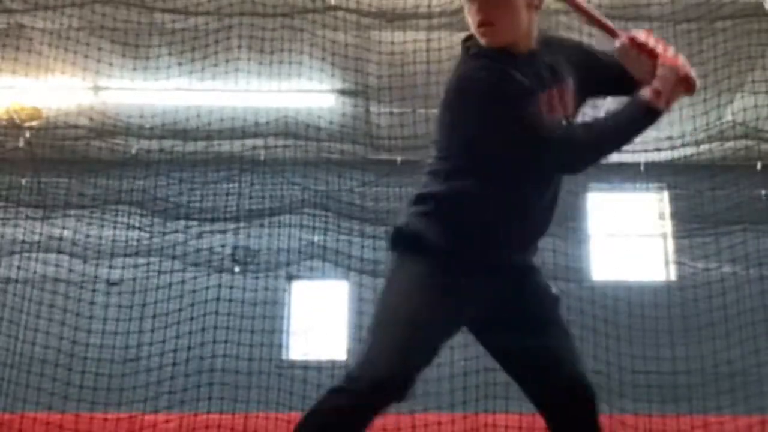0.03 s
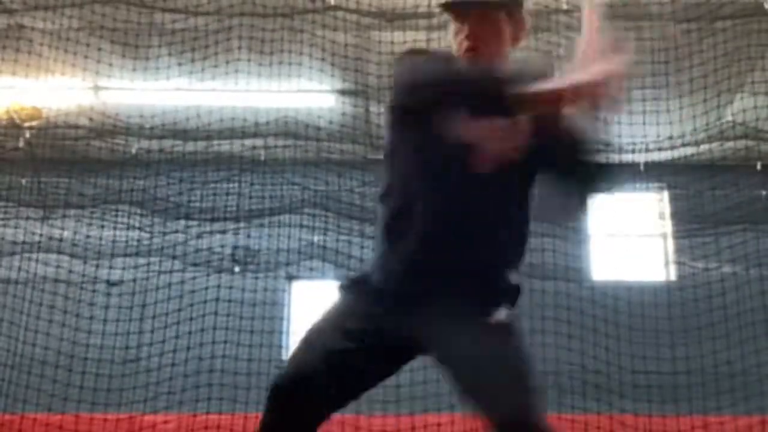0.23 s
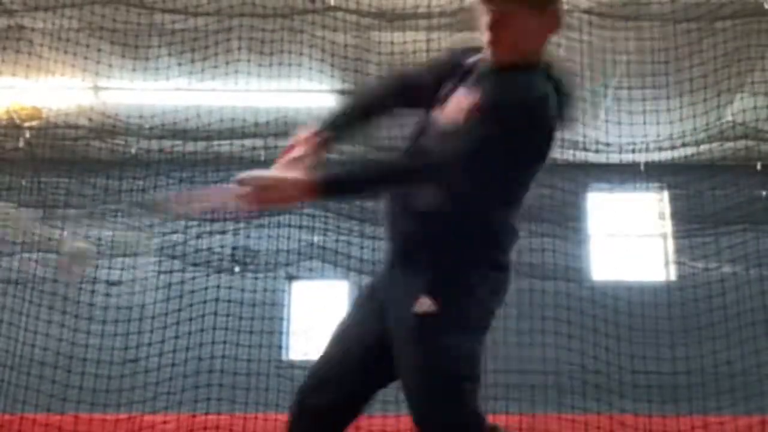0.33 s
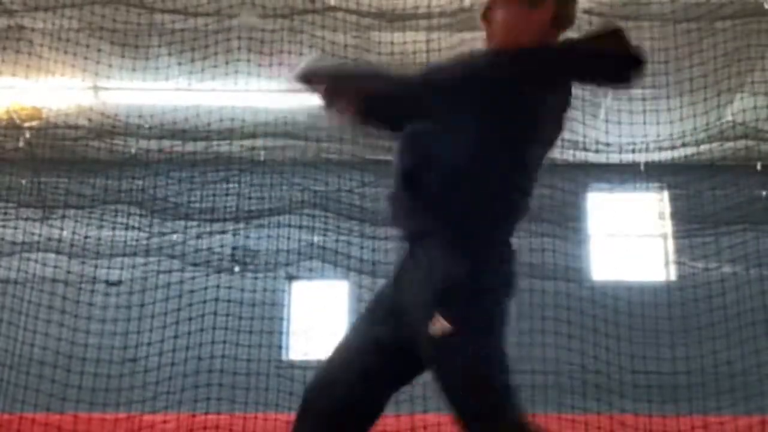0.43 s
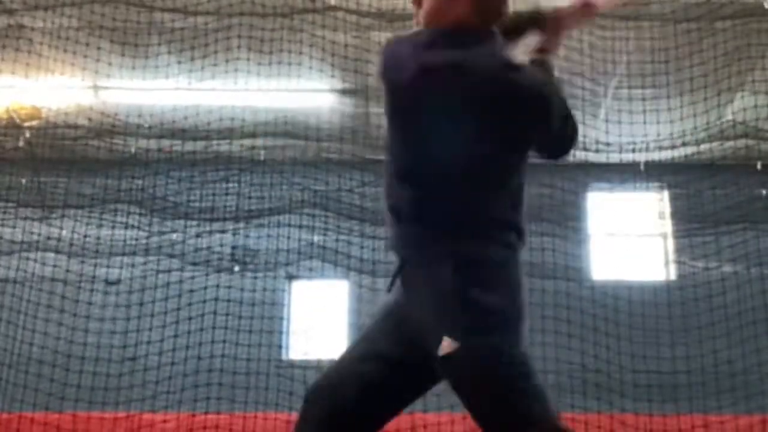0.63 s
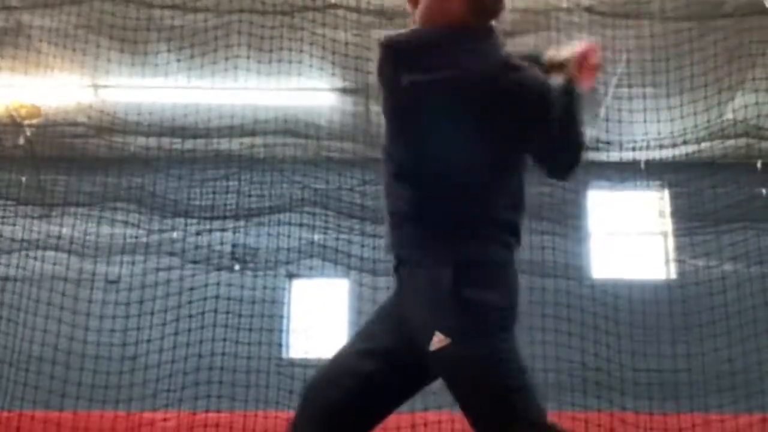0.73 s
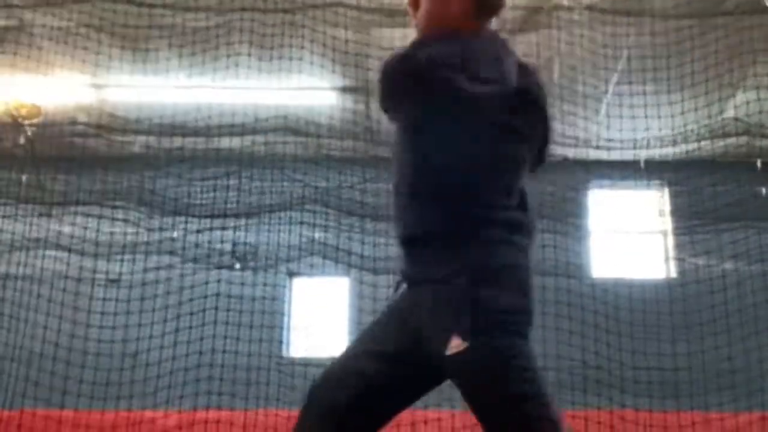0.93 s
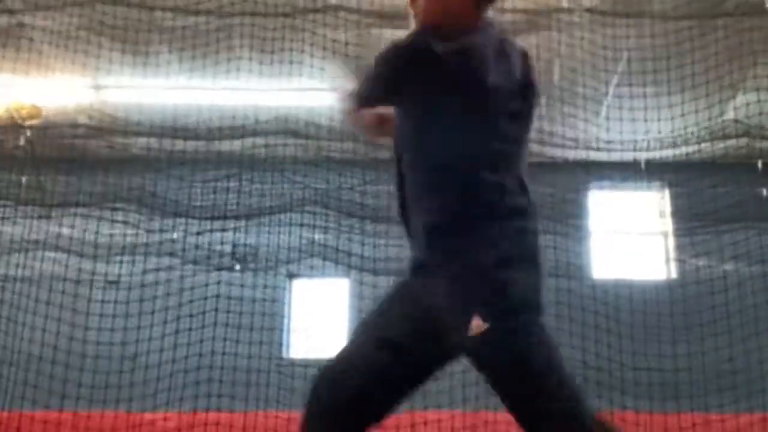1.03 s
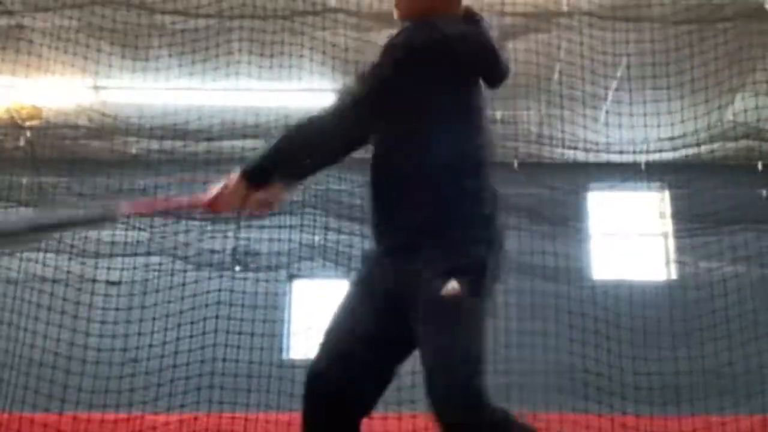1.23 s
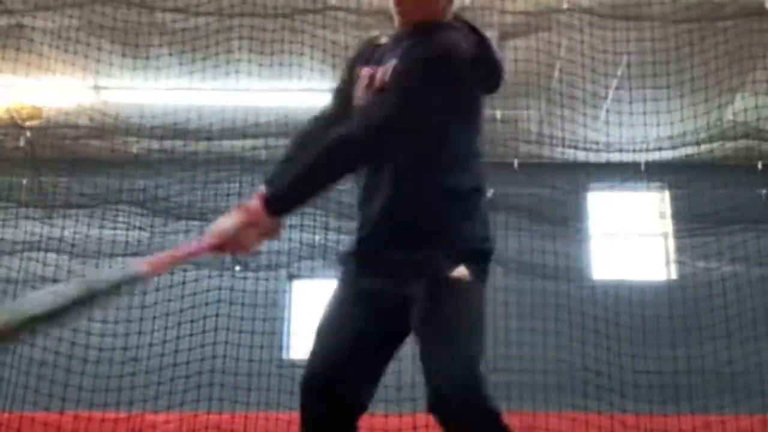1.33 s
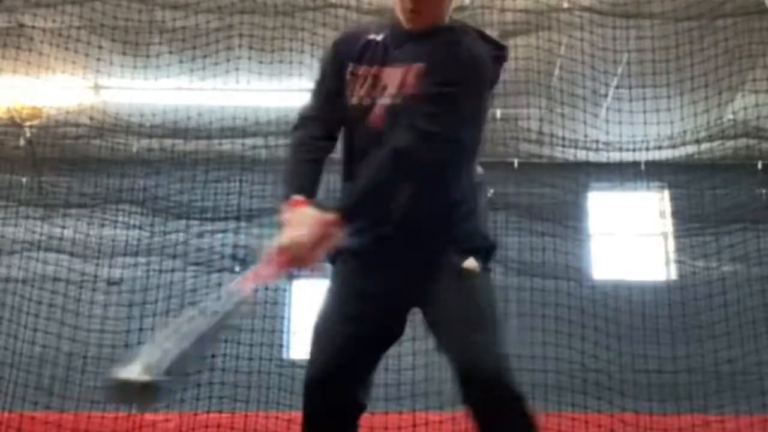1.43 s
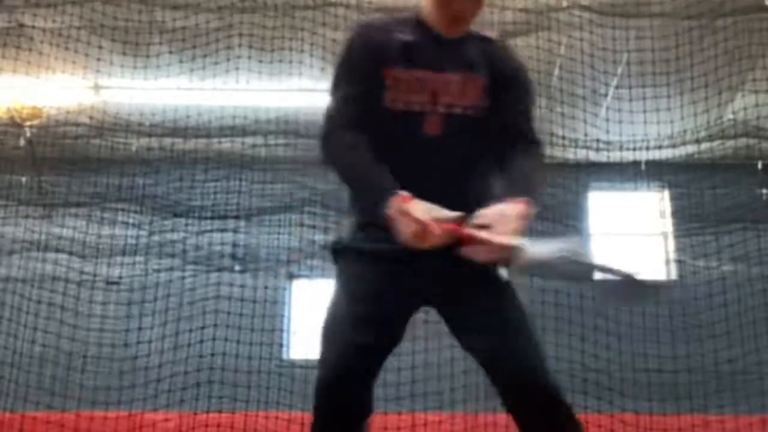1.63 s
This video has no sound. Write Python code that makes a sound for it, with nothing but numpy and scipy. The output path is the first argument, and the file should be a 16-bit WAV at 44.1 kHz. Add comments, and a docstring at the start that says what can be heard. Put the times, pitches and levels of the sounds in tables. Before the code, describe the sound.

A bat hits a ball with a sharp, bright crack at 0.24 s, after faint shoe movement and a short low whoosh. Hard slap-backs follow by 0.28 s, and the hall rings for over a second. A dull thud with faint bat ring comes at 0.65, a hollow knock at 0.82, soft bumps and scuffs around 0.9-1.2, then rustling cloth and low, heavy steps from 1.27 to 1.6 over steady rumble.

```python
"""A low whoosh, a bright crack with a brief hiss swelling into it, an instant slap-back and a long ring: a batter
swings in a netted cage in a hall. Then come a thud on the shoulder with a faint bat ring, a hollow knock,
shoe scuffs, rustling cloth and heavy steps, all over a steady low rumble. Solid contacts are sums of decaying
sine modes; air, shoes, cloth, rumble and the knocks' noisy bodies are coloured noise under level curves;
scrapes are noise in a gliding resonance; the hall is a convolved noise tail."""
import sys
import numpy as np
from scipy import signal
from scipy.fft import rfft, irfft
from scipy.io import wavfile
from scipy.ndimage import uniform_filter1d

SR = 44100
rng = np.random.default_rng(int(sys.argv[2]) if len(sys.argv) > 2 else 0)


def pcm_store(signal):
    """Save signal as 16-bit PCM."""
    levels = np.round(np.clip(np.atleast_2d(signal), -1, 1) * 32767)
    wavfile.write(sys.argv[1], SR, levels.astype(np.int16).T)


N = 74970  # length [samples]
T = np.arange(N) / SR  # time [s]
HZ = np.maximum(np.fft.rfftfreq(N, 1 / SR), 1)  # bin frequencies, kept above zero for the logarithm

HIT_S, HIT_LAG_S = 0.2351, 0.00006  # bat meets ball; delay at the right side
HALL_BUILD_S = 0.014  # rise time of the hall's tail and its lingering tones


def from_db(db):
    """Turn decibels into gain."""
    return 10 ** (np.asarray(db) / 20)


def by_hz(points):
    """Read a table over frequency at every bin, interpolating along log frequency."""
    hz, value = np.transpose(points)
    return np.interp(np.log(HZ), np.log(hz), value)


def level(points):
    """Follow a level curve of (time [s], level [dB]) and return its gain."""
    return from_db(np.interp(T, *np.transpose(points)))


def pan(db):
    """Left and right gains for a left-over-right difference in dB."""
    return from_db(np.array([[db], [-db]]) / 2)


def envelope(age, rise, t60):
    """A struck body's loudness: quick rise, then exponential decay by 60 dB in t60 seconds."""
    age = np.maximum(age, 0)
    return (1 - np.exp(-age / rise)) * np.exp(-np.log(1000) * age / t60)


def noise(colour):
    """Coloured stereo noise of rms 1, whose two sides are nearly alike in the bass."""
    # stereo likeness: (frequency [Hz], left-right correlation [-1 to 1])
    likeness = [(100, 0.99), (300, 0.94), (1000, 0.3), (3000, 0.081), (10000, 0.7)]
    mid, side = rfft(rng.standard_normal((2, N)))
    alike = by_hz(likeness)
    shared = np.sqrt(1 + alike) * mid
    opposed = np.sqrt(1 - alike) * side * [[1], [-1]]
    x = irfft(from_db(by_hz(colour)) * (shared + opposed), N)
    return x / x.std()


def grain(depth_db, size):
    """A gain that flickers at random, smoothed over size samples, with depth_db of rms swing."""
    x = uniform_filter1d(rng.standard_normal(N), size=size)
    return from_db(depth_db * x / x.std())


def struck(start, modes, lag_s=0, pitch=1, sag=0):
    """A struck body's decaying modes; they may start sharp by the share sag and settle exponentially."""
    settle_s = 0.012  # time constant of the sag
    # a positive lag delays the right side, a negative one makes it lead
    age = np.maximum(T - start - np.array([[0], [lag_s]]), 0)
    warped_age = age + sag * settle_s * (1 - np.exp(-age / settle_s))
    turn = 2 * np.pi * pitch * warped_age
    total = 0
    for k, (hz, db, rise, t60) in enumerate(modes):
        sign = (-1) ** k  # neighbouring modes start in opposite directions
        total = total + sign * from_db(db) * envelope(age, rise, t60) * np.sin(hz * turn)
    return total


def bursts(rows, colour):
    """Rough contacts: short dying puffs of noise of one colour."""
    gain = 0
    for start, db, rise, t60, pan_db in rows:
        gain = gain + from_db(db) * pan(pan_db) * envelope(T - start, rise, t60)
    return noise(colour) * gain


def rub(rows, width_hz, pan_db):
    """Friction noise in one resonance that glides with the sliding speed."""
    s, hz, db = np.transpose(rows)
    lowpass = signal.butter(2, width_hz / 2, fs=SR, output="sos")
    slow = signal.sosfilt(lowpass, rng.standard_normal((2, 2, N)))
    # slow noise on a gliding carrier becomes a band of noise around it
    turn = 2 * np.pi * np.cumsum(np.interp(T, s, hz)) / SR
    x = slow[0] * np.cos(turn) + slow[1] * np.sin(turn)
    sliding = (T > s[0]) * (T < s[-1])
    return pan(pan_db) * from_db(np.interp(T, s, db)) * sliding * x / x.std()


def crack():
    """Bat meets ball: a bright snap, the squashed ball's pock just after it and a short crackle."""
    # modes of the snap and of the ball: (frequency [Hz], level [dB], rise [s], t60 [s])
    snap_modes = [(1719, -12, 0.0004, 0.0023), (2810, 6.5, .0002, 0.0032), (3550, -10, 0.00018, 0.0027),
                  (5040, -15, 0.00022, 0.0069), (6640, -9, 0.00012, 0.0035), (9000, -6.5, .0001, 0.0018),
                  (10800, -15, 0.00011, 0.0035)]
    ball_modes = [(99.3, -20.5, .0021, 0.083), (281, -1.5, 0.0014, .014), (464, -7, 0.00038, .012),
                  (680, -7, .0002, 0.013), (877, -2, .0006, .0128), (1068, -5, 0.00044, 0.022),
                  (1290, -18, .002, 0.022), (1622, -8, .0003, 0.023), (2340, -6.5, 0.0037, 0.025),
                  (2830, -19.5, 0.00054, .043)]
    # crackle: (time [s], level [dB], rise [s], t60 [s], left over right [dB])
    crackle = [(.2352, -15.5, 0.000079, 0.004, 6), (.239, -12, 0.00025, 0.036, -3)]
    # its colour: (frequency [Hz], level [dB])
    crackle_colour = [(200, -14.5), (900, 10), (3000, 0.5), (5000, -1.5), (7000, -12), (8000, -12.5),
                      (10500, -10.5), (13000, -29.5), (16000, -34.5)]
    ball_lag_s = 0.00213
    snap = struck(HIT_S, snap_modes, HIT_LAG_S)
    pock = struck(HIT_S + ball_lag_s, ball_modes, HIT_LAG_S)
    return pan(0.5) * (snap + pock) + bursts(crackle, crackle_colour)


def whoosh_and_hiss():
    """A low whoosh of air pushed by the bat, and a brief hiss swelling into the crack."""
    # level curves: (time [s], level [dB])
    whoosh_level = [(.16, -65.5), (.195, -26), (.22, -24.5), (.24, -29), (.265, -62), (.3, -84.5)]
    hiss_level = [(.17, -88), (.218, -44.5), (.225, -28), (.23, -28), (.234, -16), (.237, -11), (.245, -88)]
    # colours: (frequency [Hz], level [dB])
    whoosh_colour = [(25, -14.5), (55, 2.5), (85, 6.5), (150, -17), (600, -22), (1200, -37.5),
                     (4000, -37.5), (9500, -51), (13000, -84.5)]
    hiss_colour = [(300, -4), (800, -6), (1400, 1.5), (1900, -7.5), (2500, -6), (4000, -7), (5500, -21.5),
                   (7000, -7.5), (8200, -34), (14000, -44.5)]
    whoosh = level(whoosh_level) * noise(whoosh_colour)
    hiss = pan(4) * level(hiss_level) * noise(hiss_colour)
    return whoosh + hiss


def slaps():
    """Hard slaps follow the crack: echoes from the cage and walls, the first carrying the bat's bright ping,
    then the ball striking the net and frame."""
    # slaps: echoes, then the ball striking the net and frame (.411 and .426 s): (time [s], level [dB], rise
    # [s], t60 [s], left over right [dB])
    slap_rows = [(.2556, -14.5, .00073, 0.02, 4.3), (.2845, -8, 0.0037, 0.027, 4.1),
                 (.325, -25, 0.0024, 0.026, 3), (.411, -23.5, 0.0017, 0.042, 1.8),
                 (.426, -30.5, .0015, 0.18, 2.7)]
    # their colour: (frequency [Hz], level [dB])
    slap_colour = [(150, -14.5), (600, -8), (1800, -11), (2550, 3), (3400, -5), (5000, -8.5), (7500, -18),
                   (11000, -29.5), (14000, -37)]
    # modes of the ping: (frequency [Hz], level [dB], rise [s], t60 [s])
    ping_modes = [(2360, -4, 0.0017, 0.012), (2610, -3.5, .002, .01), (4700, -24, .001, .015)]
    ping = pan(5.5) * struck(0.2558, ping_modes, HIT_LAG_S)
    return bursts(slap_rows, slap_colour) + ping


def hall(x):
    """Convolve with a grainy tail of scattered reflections that builds up, then dies band by band."""
    # bands of the ring: (centre [Hz], level [dB], t60 [s])
    bands = [(49.1, -1.5, 1.5), (150, 18, 1.6), (298.7, 16.5, 1.5), (573, 10.5, 1.1), (1080, 19.5, 1.02),
             (1420, 17, 1.27), (1800, 19, 1.28), (2033, 11.5, 1.38), (2500, 18.5, 1.14), (4560, 6.5, 1.03),
             (7500, -4, 0.91), (10400, -17, 0.79), (14000, -25, 0.45)]
    white = noise([(1, 0), (SR, 0)]) * grain(1.5, size=200)
    spectrum = rfft(white)
    tail = 0
    for k, (_, db, t60) in enumerate(bands):
        # each band cross-fades into its neighbours along log frequency
        weight = by_hz([(row[0], j == k) for j, row in enumerate(bands)])
        # a longer decay is scaled down so that its energy stays comparable
        gain = from_db(db) * np.sqrt(2 * np.log(1000) / (t60 * SR))
        tail = tail + gain * irfft(spectrum * weight, N) * envelope(T, HALL_BUILD_S, t60)
    return signal.fftconvolve(x, tail, axes=1)[:, :N]


def hall_tones():
    """Tones that linger in the hall after the crack, all dying at one rate."""
    # lingering tones: (frequency [Hz], level [dB])
    tones = [(1005, -44), (1213, -49.5), (1700, -48), (2272, -51.5), (2405, -49), (2560, -50),
             (2906, -46.5)]
    t60_s = 1.4
    modes = [(hz, db, HALL_BUILD_S, t60_s) for hz, db in tones]
    return struck(HIT_S, modes, lag_s=0.0001)


def knocks():
    """Shoulder thud with bat ring, hollow knock with a sagging boom, soft bump, tap, and small hard contacts."""
    # modes of each body: (frequency [Hz], level [dB], rise [s], t60 [s])
    shoulder_modes = [(228.6, -25, 0.00027, 0.16), (325, -20, 0.0058, 0.083), (426, -23, .0003, 0.071),
                      (538, -22.5, 0.00033, 0.061), (848, -29.5, .0003, 0.076), (1142, -26, .0006, 0.097),
                      (1564, -43.5, .0013, .1), (2064, 0, 0.0091, 0.014), (2520, -29.5, 0.0025, 0.059),
                      (2726, -28, .0015, 0.089), (150, -18, .001, 0.047)]
    hollow_modes = [(71, -34.5, .003, 0.26), (292, -21.5, 0.0018, 0.024), (522, -23, 0.0039, 0.067),
                    (634, -20.5, 0.0036, 0.073), (844, -27, 0.0035, 0.065), (2410, -33.5, 0.0039, 0.034)]
    boom_modes = [(283.5, -29, 0.0051, 0.17), (316.3, -24, 0.00051, 0.12)]
    bump_modes = [(105, -31.5, 0.0018, 0.051), (220, -33.5, .0017, 0.066), (298, -32.5, 0.0019, 0.078),
                  (545, -41.5, .001, 0.035)]
    tap_modes = [(333, -45, 0.00092, 0.073), (580, -42.5, 0.0026, 0.076), (674, -48, 0.0023, 0.053)]
    # the bat's long ring: (frequency [Hz], level [dB])
    bat_ring = [(4167, -54.5), (4700, -56), (5103, -48.5), (5416, -59), (6040, -58), (6551, -58.5),
                (6837, -57)]
    # noisy contacts: (time [s], level [dB], rise [s], t60 [s], left over right [dB])
    ticks = [(.645, -33.5, .0018, 0.092, 3), (.657, -37, .001, 0.047, -6), (.831, -40, 0.00075, 0.03, 8),
             (1.264, -53, .001, .04, 12), (1.405, -45, .004, .06, 4)]
    clicks = [(.131, -45.5, .001, 0.031, 1.5), (.657, -37.5, .0005, 0.011, 0),
              (.8195, -34.5, 0.00066, 0.019, 2), (1.173, -43.5, 0.0013, 0.02, -1),
              (1.6, -50.5, .001, 0.019, 8)]
    # their colours: (frequency [Hz], level [dB])
    tick_colour = [(300, 7.5), (1500, -5.5), (2400, 5.5), (3700, -2), (5000, -27), (8000, -19.5),
                   (13000, -47)]
    click_colour = [(500, 3), (2800, 1), (3800, 6.5), (4500, -11.5), (5200, -9.5), (6200, -23),
                    (8000, -14.5), (13000, -31)]
    hollow_s, boom_lag_s, ring_t60_s = 0.8235, 0.01, 0.2
    ring_modes = [(hz, db, 0.002, ring_t60_s) for hz, db in bat_ring]
    shoulder = struck(0.6544, shoulder_modes + ring_modes, lag_s=-0.000462)
    hollow = struck(hollow_s, hollow_modes, lag_s=-0.00046)
    boom = struck(hollow_s + boom_lag_s, boom_modes, lag_s=-0.00073, sag=0.17)
    bump = struck(0.886, bump_modes, lag_s=-0.00048)
    tap = struck(1.088, tap_modes)
    hard = bursts(ticks, tick_colour) + bursts(clicks, click_colour)
    return shoulder + hollow + boom + bump + tap + hard


def floor_steps():
    """Heavy steps set the floor's low modes booming, each at its own pitch."""
    # modes of the floor: (frequency [Hz], level [dB], rise [s], t60 [s])
    floor_modes = [(94.7, 0.5, 0.011, 0.12), (126.4, 2, 0.0024, 0.039), (190.6, -9, 0.0042, 0.15),
                   (275, -16.5, 0.0092, 0.11)]
    # steps: (time [s], level [dB], pitch [ratio])
    steps = [(1.272, -12.5, 0.93), (1.304, -22, 1.1), (1.358, -24.5, 0.926), (1.391, -22, 0.95),
             (1.422, -24, 0.87), (1.501, -15.5, 0.98), (1.515, -21, 1.053), (1.539, -30.5, 1.12),
             (1.589, -26, 1.03)]
    return sum(from_db(db) * struck(s, floor_modes, pitch=pitch) for s, db, pitch in steps)


def shoes_and_knock_bodies():
    """Noise puffs for shoe scuffs and the noisy body of thud and knock; swelling strides, a gliding scrape."""
    # puffs: shoe scuffs, and the noisy body of the thud (.656 s) and the hollow knock (.828 s):
    # (time [s], level [dB], rise [s], t60 [s], left over right [dB])
    puffs = [(.026, -32, 0.0025, .11, 1.5), (.058, -42, 0.0035, 0.098, 2.5),
             (.656, -27.5, 0.0017, 0.1, -0.5), (.828, -41, 0.002, .1, 2), (.995, -32.5, .016, .11, 4),
             (1.032, -47, 0.021, .28, 3.5), (1.175, -40, 0.0015, 0.034, 5)]
    # level curves: (time [s], level [dB])
    stride_level = [(.02, -85.5), (.035, -58), (.11, -44.5), (.18, -48.5), (.24, -43), (.3, -89)]
    shuffle_level = [(1.42, -59), (1.5, -37), (1.53, -32.5), (1.57, -44.5), (1.61, -39), (1.7, -44.5)]
    # colours: (frequency [Hz], level [dB])
    puff_colour = [(100, -14), (290, 13), (450, -6), (700, 3.5), (1200, -0.5), (2300, 1), (3400, -20.5),
                   (8000, -34.5), (13000, -44)]
    stride_colour = [(100, 7.5), (270, 8), (500, -6), (1000, -2), (2400, -1), (3500, -14), (7000, -24.5),
                     (10000, -27), (12500, -46)]
    shuffle_colour = [(50, -22), (110, 4), (190, 6), (300, -7), (450, -14), (900, -24.5), (2000, -42.5),
                      (8000, -78)]
    # sole scrape: (time [s], resonance [Hz], level [dB])
    sole_scrape = [(1.169, 3384, -76), (1.176, 2893, -46.5), (1.181, 1990, -47), (1.188, 1300, -51.5),
                   (1.205, 1110, -65)]
    stride = level(stride_level) * noise(stride_colour)
    shuffle = level(shuffle_level) * noise(shuffle_colour)
    scrape = rub(sole_scrape, width_hz=1800, pan_db=5)
    return bursts(puffs, puff_colour) + stride + shuffle + scrape


def clothes():
    """Cloth rubs on cloth: sleeves brush and zip in a gliding resonance, and a grainy rustle flickers."""
    # sleeve rubs: (time [s], level [dB], rise [s], t60 [s], left over right [dB])
    sleeve_rubs = [(1.212, -56.5, .002, 0.34, 0.0), (1.258, -57, 0.009, 0.38, 0.0)]
    # sleeve zip: (time [s], resonance [Hz], level [dB])
    sleeve_zip = [(1.208, 4900, -78), (1.217, 4700, -64), (1.235, 3945, -67.5), (1.27, 4190, -58.5),
                  (1.315, 3650, -61.5), (1.345, 3500, -73), (1.39, 3550, -60), (1.45, 3530, -74)]
    # rustle: (time [s], level [dB])
    rustle_level = [(1.19, -79), (1.24, -62.5), (1.3, -51.5), (1.35, -54.5), (1.45, -50.5), (1.515, -43.5),
                    (1.56, -50), (1.61, -52), (1.7, -69)]
    # colours: (frequency [Hz], level [dB])
    sleeve_colour = [(500, -30), (2900, -10), (3300, 7), (3700, -10), (5500, -11.5), (8000, -22),
                     (12000, -40.5)]
    rustle_colour = [(40, -16), (150, 11.5), (300, 10), (600, 1.5), (1200, 1), (2700, -7.5), (3500, -4),
                     (4800, -9.5), (7000, -17.5), (10000, -28.5), (12500, -55.5)]
    sleeves = bursts(sleeve_rubs, sleeve_colour) + rub(sleeve_zip, width_hz=480, pan_db=6)
    rustle = level(rustle_level) * noise(rustle_colour) * grain(1.5, size=260)
    return sleeves + rustle


def air():
    """The hall's steady low rumble, as noise weighted towards the bass."""
    # colour of the rumble: (frequency [Hz], level [dB])
    air_colour = [(20, -14.5), (40, -2.5), (60, -4.5), (95, 1.5), (140, -10.5), (300, -21.5), (550, -32.5),
                  (1200, -36), (2500, -35.5), (4500, -50), (9500, -59), (12500, -88.5)]
    return from_db(-44.5) * noise(air_colour)


def scene():
    """The crack reaches the hall as one sharp impulse; the nearby small sounds stay drier."""
    near_to_hall_db = -38  # how much the nearby sounds excite the hall
    near = knocks() + floor_steps() + shoes_and_knock_bodies() + clothes()
    impulse = pan(1.5) * (np.arange(N) == int(HIT_S * SR))
    room = hall(impulse + from_db(near_to_hall_db) * near) + hall_tones() + slaps()
    return crack() + whoosh_and_hiss() + near + room + air()


def record(dry):
    """The microphone loses the deepest bass and the top, and the loudest peaks are rounded."""
    low_hz, high_hz, cutoff_hz = 45, 11800, 16400
    ceiling = 0.82  # the level that rounded peaks approach [full scale]
    x = signal.sosfilt(signal.butter(2, low_hz, "high", fs=SR, output="sos"), dry)
    x = ceiling * np.tanh(x / ceiling)
    x = signal.sosfilt(signal.butter(4, high_hz, fs=SR, output="sos"), x)
    # a steep final cut, 70 dB down from the cutoff upwards
    return signal.sosfilt(signal.cheby2(14, 70, cutoff_hz, fs=SR, output="sos"), x)


dry = scene()
out = record(dry)
pcm_store(out)
```